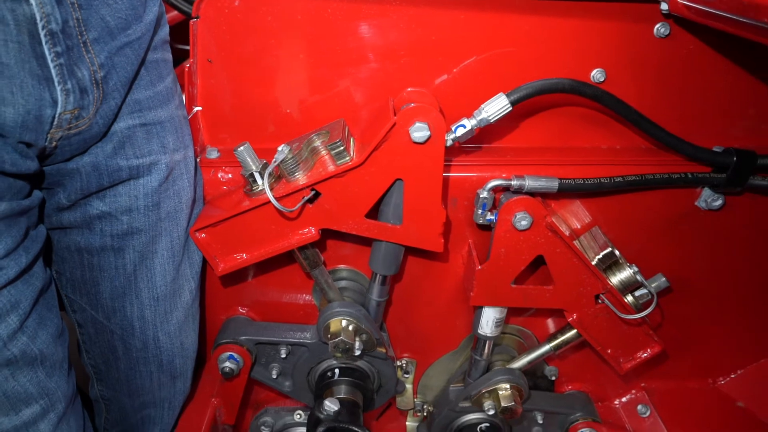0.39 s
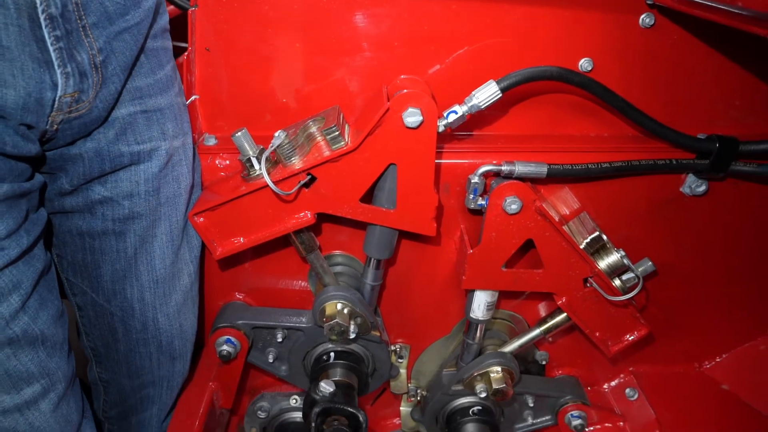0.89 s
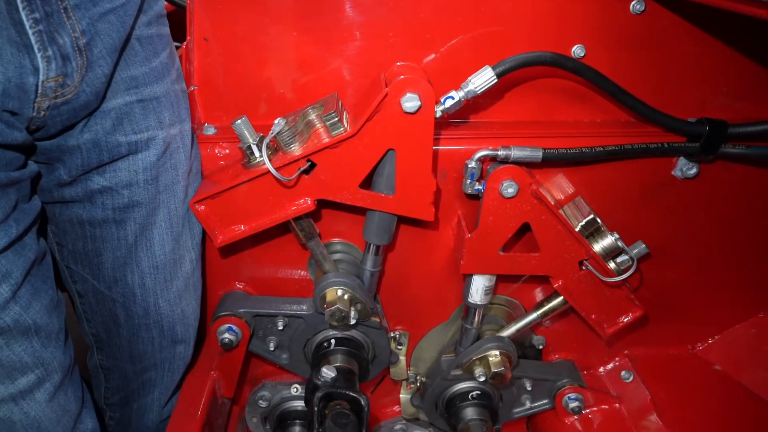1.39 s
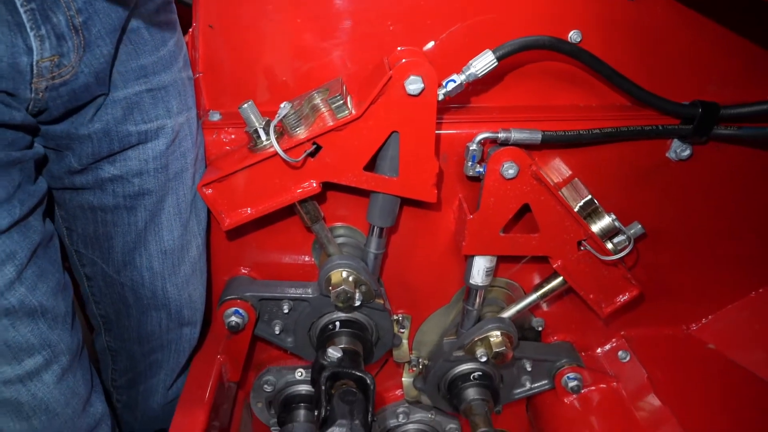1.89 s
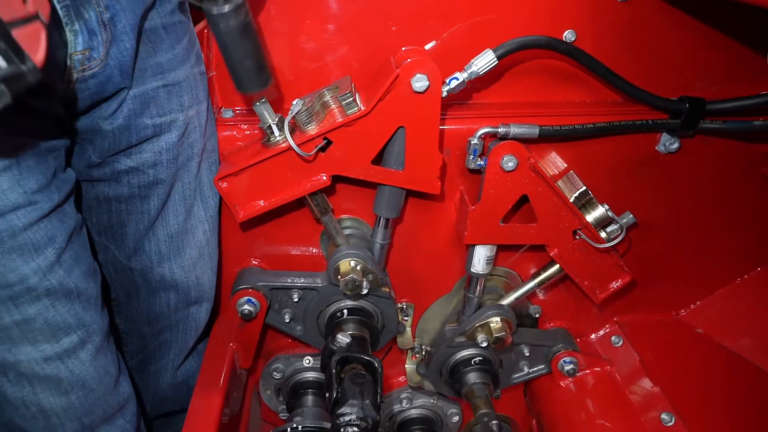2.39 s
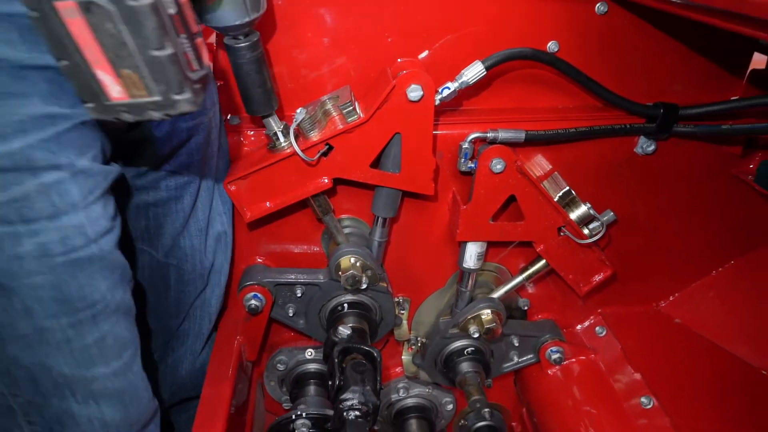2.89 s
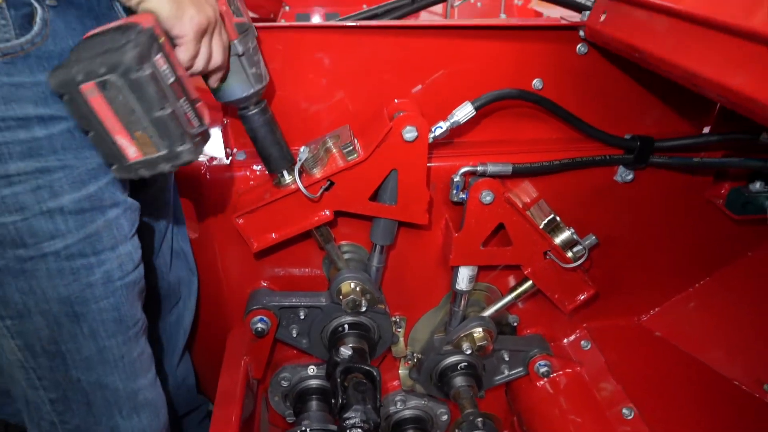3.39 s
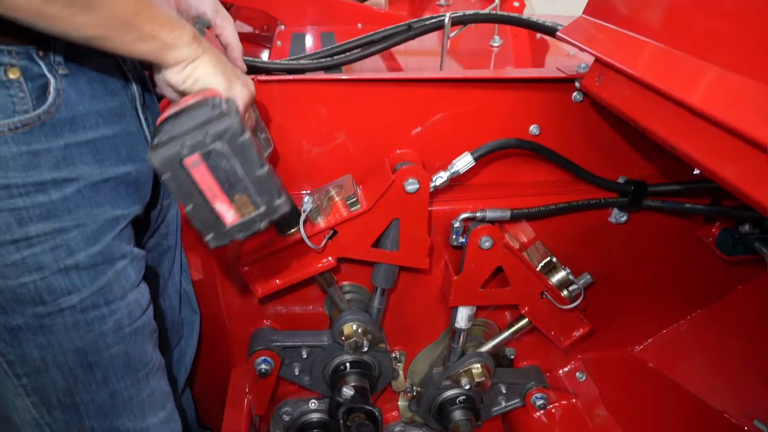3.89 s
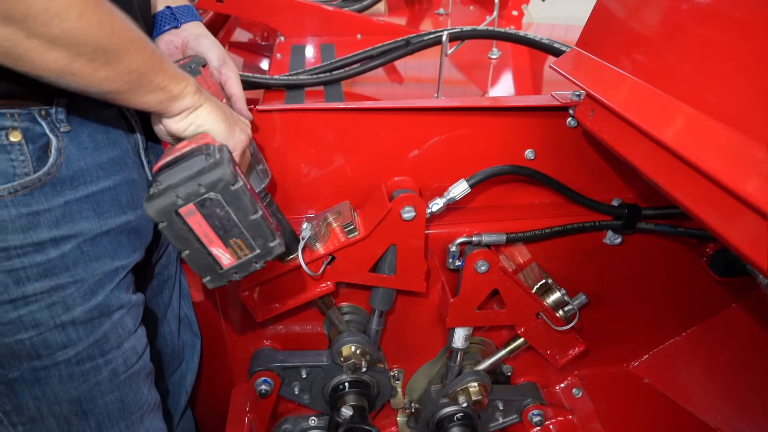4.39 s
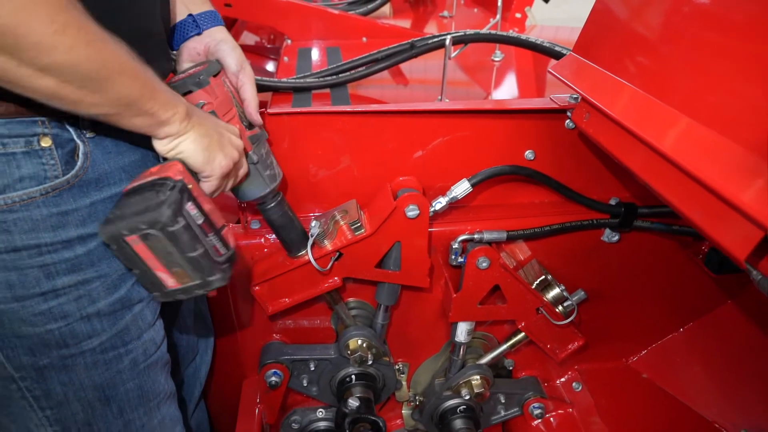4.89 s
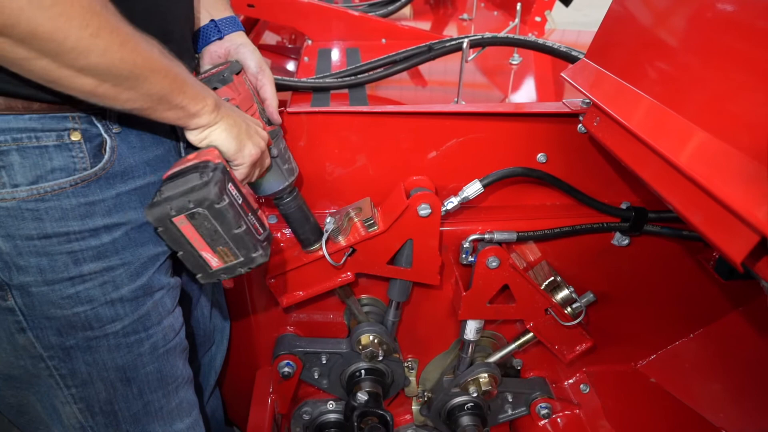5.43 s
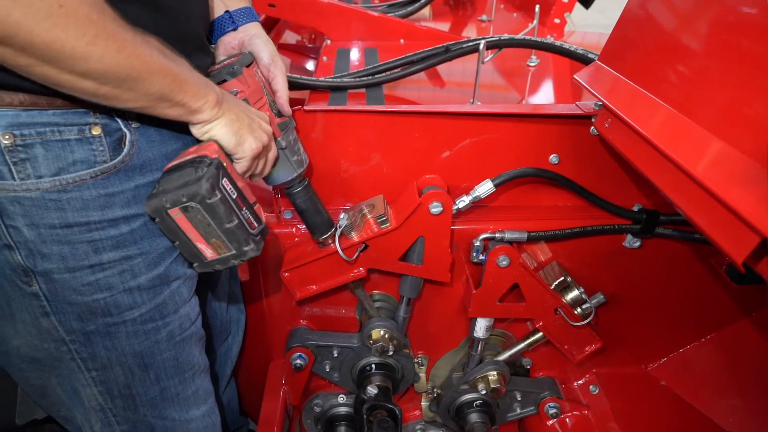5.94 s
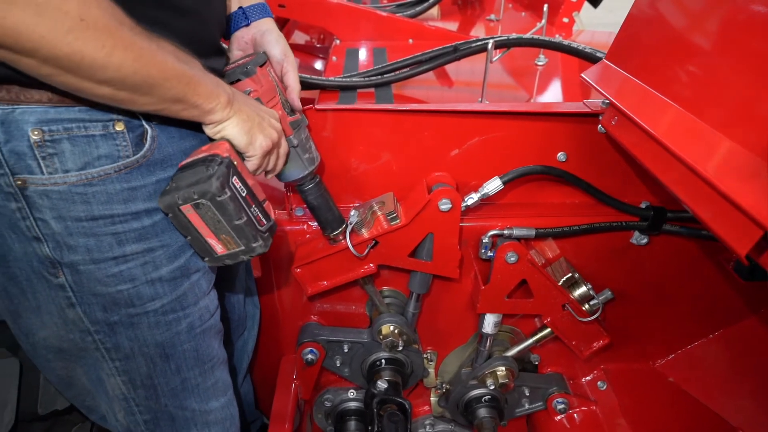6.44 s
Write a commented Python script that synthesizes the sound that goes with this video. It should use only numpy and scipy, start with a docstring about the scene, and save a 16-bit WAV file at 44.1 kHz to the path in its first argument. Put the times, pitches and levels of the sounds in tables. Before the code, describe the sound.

Close recording of a cordless impact driver at a metal machine inside a big hall. First comes a sharp panel knock and a rattling, ringing pin; then sparse clicks, faint taps and low room hum. A heavy double socket knock precedes about half a second of irregular harsh hammering, a groaning grind, a brief gear whine that rises and falls, braking clacks, and a long diffuse tail.

```python
"""The echo of an earlier blow dies away, sheet metal is knocked, then a steel pin clatters on it in a large hall.
A cordless impact driver is blipped, its socket knocks onto a bolt, it hammers, grinds the bolt round, runs free
with a gear whine and stops. Blows are noise bursts with ringing modes; the drive is grains, gliding gear tones,
a switching tone and a low shake. Taps, ticks, cloth, air, a hum and a low rumble fill in; the hall is a
decaying noise tail."""
import sys
import numpy as np
from scipy import signal
from scipy.fft import rfft, irfft
from scipy.io import wavfile
from scipy.ndimage import uniform_filter1d

SR = 44100
rng = np.random.default_rng(int(sys.argv[2]) if len(sys.argv) > 2 else 0)


def wrap_up_sound(samples):
    """Save the sound to the file named by the first command line argument, as 16-bit audio."""
    columns = np.atleast_2d(samples).T
    # keep every value between -1 and 1, then stretch to whole-number steps
    tamed = np.clip(columns, -1, 1)
    steps = np.round(tamed * 32767).astype(np.int16)
    wavfile.write(sys.argv[1], SR, steps)


def volts(x):
    """Linear amplitude factor 10**(x/20) for a level x in dB, scalar or array-like."""
    e = np.asarray(x, float) / 20
    return 10 ** e


N = 288855  # samples in the scene


def evened(x):
    """Scales to rms 1."""
    return x / np.sqrt(np.mean(x ** 2) + 1e-20)


def read(points, hz):
    """Reads a spectrum table on a log frequency axis."""
    f, value = np.transpose(points)
    return np.interp(np.log(hz + 1), np.log(f + 1), value)


def add(mix, s, sound):
    """Mixes a sound in at time s in seconds, cut at the end of the mix."""
    part = mix[round(s * SR):][:len(sound)]
    part += sound[:len(part)]


def coloured(x, points):
    """Filters x by a spectrum table; rms 1."""
    hz = np.fft.rfftfreq(len(x), 1 / SR)
    return evened(irfft(rfft(x) * volts(read(points, hz)), len(x)))


def split(x, hz):
    """Low and high part of x."""
    return [signal.sosfilt(signal.butter(3, hz, kind, fs=SR, output="sos"), x) for kind in ("low", "high")]


def wander(count, width):
    """Slow random drift, rms 1: noise averaged over a width in samples."""
    return evened(uniform_filter1d(rng.standard_normal(count), width))


def blows(table, colour, modes, ring_db, hollow_db, treble_share, crack_db, hall_db):
    """Each blow: a hollow body burst, a treble rattle with a crack, and modes at random strengths."""
    near, far = np.zeros(N), np.zeros(N)
    hz, mode_db, ring = np.transpose(modes)[:, :, None]
    ring = np.clip(ring, .01, .3)
    t, bins = np.arange(10240) / SR, np.fft.rfftfreq(10240, 1 / SR)
    fade = np.cos(np.pi / 2 * t / t[-1]) ** .5
    for s, level_db, treble_db, t60, hollow_hz in table:
        t60 = np.clip(t60, .008, .35)
        strength = volts(level_db)
        body = 1 / np.sqrt(1 + volts(2 * treble_db))  # body and treble share the blow's strength
        low, high = split(coloured(rng.standard_normal(len(t)), colour), 3800)

        # the body swells in and dies, boosted around its hollow resonance
        hollow = volts(hollow_db / (1 + (np.log2((bins + 1) / hollow_hz) / 0.19) ** 2))
        boxed = evened(irfft(rfft(low) * hollow))
        swell = body * (1 - np.exp(-t / 0.00038)) * volts(-60 * t / t60) * fade

        # the very top takes an extra decay, so it dies fastest
        mid, top = split(evened(high), 12000)
        top *= volts(-40 * t / t60) * (1 - np.exp(-t / .002))
        crack = volts(crack_db - 60 * t / 0.013)
        rattle = volts(-60 * t / (t60 * treble_share)) + crack
        treble = body * volts(treble_db) * (mid + top) * rattle * fade

        phase, luck_db = rng.random(hz.shape), 4 * rng.standard_normal(hz.shape)
        level = body * volts(ring_db + mode_db + luck_db + treble_db * (hz > 3800))
        rung = level * volts(-60 * t / ring) * np.sin(2 * np.pi * (hz * t + phase))
        add(near, s, strength * ((boxed * swell + treble) / 2 + rung.sum(0) * fade))
        # the hall hears the whole machine: no hollow boost, no modes
        add(far, s, strength * volts(hall_db) * (evened(low) * swell + treble) / 2)
    return near, far


# Hammer striking the anvil. Each row: start in seconds, relative level in dB, treble over body in dB.
HAMMER_BLOWS = [(4.822, -13.5, -5), (4.883, 0, -5), (4.894, 0, 0), (4.907, -3.5, -1), (4.913, -1, 1),
                (4.957, -2, 8.5), (4.997, -5.5, 0.5), (5.014, -2.5, -5), (5.044, -1, 6), (5.092, -4.5, 4),
                (5.136, -7, 4), (5.146, -8.5, 1.5), (5.204, -13.5, -4.5), (5.22, -15, 4),
                (5.289, -13.5, -1.5)]
# Tone of the hammer mechanism. Each row: frequency in Hz, relative density in dB per Hz.
HAMMER_SPECTRUM = [(180, -30), (300, -5.5), (1330, 10.5), (1930, 10.5), (2210, 9), (3650, 9), (4610, -3),
                   (6780, 12.5), (9020, -2), (10100, -9.5), (14900, -7.5), (15700, -11.5), (16500, -43.5)]
# Modes of the struck anvil. Each row: frequency in Hz, relative level in dB, time to fall 60 dB in seconds.
ANVIL_MODES = [(3650, -5, 0.046), (6640, -8, 0.035), (6240, 3, 0.058), (6740, -9.5, .04),
               (6630, -2.5, 0.14), (8050, -1, 0.057), (9100, -3.5, 0.096), (14400, -25.5, 0.036)]


def hammering():
    """Hammer blows ring the anvil over a short hollow body."""
    t60_s, hollow_hz = 0.082, 2600
    table = [(*row, t60_s, hollow_hz) for row in HAMMER_BLOWS]
    return blows(table, HAMMER_SPECTRUM, ANVIL_MODES, -17.5, 3.2, 0.88, 1.3, hall_db=-5)


# The driver under way. Each row: time in seconds, body level in dB, treble relative to that level in dB,
# low shudder relative to that level in dB.
GRIND_LEVELS = [(4.815, -29.5, 16, -19), (4.829, -32.5, 1.5, -24), (4.88, -23, -11, -13),
                (4.95, -24, -8, -10.5), (5.15, -24, -4, -10.5), (5.22, -19, -8.5, -4),
                (5.498, -23.5, -11, -7), (5.56, -18.5, -6, -16), (5.72, -17.5, -3.5, -11.5),
                (5.8, -18, -7, -15), (5.9, -19.5, -8.5, -8), (5.941, -52.5, -12.5, 20.5)]
# Tone of the grind before its registers are balanced. Each row: frequency in Hz, density in dB per Hz.
GRIND_SPECTRUM = [(47, -27.5), (80, -19), (153, -21.5), (407, -13.5), (761, -3.5), (951, -5), (1660, -2),
                  (2710, -1), (3240, -2.5), (3700, -1.5), (4950, -5.5), (5790, -1.5), (10100, -15),
                  (15100, -41), (16500, -52.5)]


def grind():
    """Gears, motor and the turning bolt: dense uneven grains in three registers."""
    s, level_db, treble_db, shudder_db = np.transpose(GRIND_LEVELS)
    t = np.arange(s[0], s[-1], 1 / SR)
    grains_per_s = 15000
    size = volts(1.5 * np.minimum(rng.exponential(1, len(t)), 4))
    size *= rng.random(len(t)) < grains_per_s / SR
    noise = coloured(size * rng.standard_normal(len(t)), GRIND_SPECTRUM)
    rest, treble = split(noise, 3010)
    shudder, body = split(rest, 430)
    parts = ((body, 0 * s), (treble, treble_db), (shudder, shudder_db))
    sound = sum(evened(p) * volts(np.interp(t, s, level_db + db)) for p, db in parts)
    out = np.zeros(N)
    add(out, s[0], sound * signal.windows.tukey(len(t), .02))
    return out


# Gear mesh and its side orders. Each row: multiple of the mesh pitch, relative level in dB,
# rms pitch jitter as a share.
GEAR_ORDERS = [(.26, -1, .06), (.3, -3, .06), (.34, -1, .045), (.7, -4, .008), (.77, -3, .008),
               (1, 0, .005), (1.24, -8, .004), (1.55, -8, .004), (2, -11, .005), (2.3, -14, .004),
               (2.8, -13, .004)]
# What the tool's case lets through. Each row: frequency in Hz, gain in dB.
CASE_RESPONSE = [(500, -6), (1200, 0), (3800, 0), (4300, -6), (4650, 0), (5200, -10), (5650, 0), (7500, 0),
                 (10000, 0), (10700, -8)]


def whine():
    """Free run: gear orders climb and fall along a bowed arch, fluttering in strength and pitch."""
    start_s, top_s, end_s = 5.535, 5.712, 5.862
    top_hz, end_hz, bow = 3840, 2150, 2.6
    level_db, slow_db = -24, 6  # at top speed; louder per octave below it
    side_loss_db = 28  # side orders lose this much per octave below top speed
    t = np.arange(start_s, end_s, 1 / SR) - top_s
    mesh_hz = top_hz - (top_hz - end_hz) * np.maximum(t / t[0], t / t[-1]) ** bow
    slow = np.log2(top_hz / mesh_hz)  # octaves below top speed
    sound = np.zeros(len(t))
    for multiple, order_db, jitter in GEAR_ORDERS:
        order_hz = multiple * mesh_hz * (1 + jitter * wander(len(t), 200))
        flutter_db = 2.64 * evened(uniform_filter1d(wander(len(t), 500), 500))
        order_db = order_db - (multiple != 1) * side_loss_db * slow
        level = volts(order_db + flutter_db + read(CASE_RESPONSE, order_hz))
        sound += level * np.sin(2 * np.pi * np.cumsum(order_hz) / SR)
    sound *= np.sqrt(2) * volts(level_db + slow_db * slow) * signal.windows.tukey(len(t), .18)
    out = np.zeros(N)
    add(out, start_s, sound)
    return out


# Bands that sing under load. Each row: start in seconds, end in seconds, pitch in Hz,
# rms waver as a share, peak level in dB.
GROANS = [(5.2, 5.5, 277, .03, -38), (5.19, 5.35, 318, .03, -40), (5.15, 6.4, 175, .03, -49),
          (4.88, 5.5, 2030, .015, -28), (4.82, 4.91, 2750, .04, -29), (5.18, 5.48, 4780, .016, -35)]


def groan():
    """Wavering tones of the loaded frame and gears."""
    out = np.zeros(N)
    for start, end, hz, waver, db in GROANS:
        t = np.arange(0, end - start, 1 / SR)
        drift = 1 + waver * wander(len(t), round(10 * SR / hz))  # over ten cycles
        tone = np.sin(2 * np.pi * np.cumsum(hz * drift) / SR)
        add(out, start, volts(db) * tone * signal.windows.tukey(len(t), .4))
    return out


# Motor controller on. Each row: start in seconds, end in seconds, tone in dB, octave in dB, each sideband in dB,
# sideband spacing at the start in Hz, spacing at the end in Hz.
CONTROLLER_BURSTS = [(1.797, 1.968, -53, -62, -62, 83, 83), (4.805, 4.82, -40, -66, -60, 10, 100),
                     (4.82, 4.89, -50, -70, -42, 230, 250), (5.47, 5.575, -70, -90, -41, 20, 850)]


def controller():
    """Switching tone, its octave, sidebands spaced by rotor speed, and winding buzz at each commutation."""
    switch_hz, buzz_db = 7880, 12
    out = np.zeros(N)
    for start, end, tone_db, octave_db, side_db, first_hz, last_hz in CONTROLLER_BURSTS:
        t = np.arange(0, end - start, 1 / SR)
        a = 2 * np.pi * switch_hz * t
        rotor = 2 * np.pi * np.cumsum(np.linspace(first_hz, last_hz, len(t))) / SR
        sound = (volts(tone_db) + 2 * volts(side_db) * np.cos(rotor)) * np.sin(a)
        sound += volts(octave_db) * np.sin(2 * a)
        # two noise puffs per rotor cycle
        puffs = np.diff(rng.standard_normal(len(t) + 1)) * np.exp(-(rotor / np.pi % 1) / 0.29)
        sound += volts(octave_db + buzz_db) * puffs
        add(out, start, np.sqrt(2) * sound * signal.windows.tukey(len(t), .1))
    return out


# Gears clacking under the brake. Each row: start in seconds, relative level in dB.
BRAKE_CLACKS = [(5.813, -2.5), (5.831, -7), (5.865, -3), (5.88, -8.5), (5.90, -6), (5.923, -12.5)]


def braking():
    """Gears clack with the anvil's modes as the brake stops the motor."""
    treble_db, t60_s, hollow_hz = -6.5, 0.07, 1700
    table = [(*row, treble_db, t60_s, hollow_hz) for row in BRAKE_CLACKS]
    return blows(table, HAMMER_SPECTRUM, ANVIL_MODES, -23, 3.4, 1.0, 2, hall_db=-42.5)


# Trigger pulled and let go. Each row: start in seconds, relative level in dB, treble over body in dB,
# nominal time to fall 60 dB in seconds, hollow resonance in Hz.
TRIGGER_MOVES = [(1.811, -20, -10, 0.27, 2480), (1.822, -25.5, 1, .087, 2460),
                 (1.836, -12.5, -3, 0.061, 2120), (1.970, -26.5, -1, 0.2, 1970),
                 (1.9773, -9, -2, 0.03, 1570), (2.005, -28.5, -12, 0.028, 1900),
                 (2.019, -23.5, -7.5, 0.045, 2030), (2.036, -28.5, -20, 0.043, 1250)]
# Tone of the clicks. Each row: frequency in Hz, relative density in dB per Hz.
CLICK_SPECTRUM = [(120, -39), (200, -3), (961, 4), (1220, 12.5), (2050, 12), (4290, 6.5), (5870, 10),
                  (9840, -9.5), (13000, -14.5), (15600, -14), (16500, -26.5)]
# Modes of the driver housing. Each row: frequency in Hz, relative level in dB,
# nominal time to fall 60 dB in seconds.
HOUSING_MODES = [(2120, 21.5, 0.0087), (3980, -5, 0.024), (6320, 12, 0.0079), (7250, -6, .02),
                 (11154, -29, 0.24)]


def trigger():
    """Trigger clicks excite the short modes of the housing."""
    return blows(TRIGGER_MOVES, CLICK_SPECTRUM, HOUSING_MODES, -23, 6.6, 1.0, 1.3, hall_db=-25.5)


# A first knock on sheet metal, then a steel pin clattering on it. Each row: start in seconds,
# relative level in dB, treble over body in dB, nominal time to fall 60 dB in seconds, hollow resonance in Hz.
SHEET_BLOWS = [(.181, -7, -1, 0.28, 1674), (.429, -19.5, 0.5, 0.31, 1135), (.462, -3.5, 2.5, 0.4, 894),
               (.488, -11, -10, 0.23, 875), (.529, -10.5, -0.5, 0.26, 821), (.555, -12.5, 1.5, .2, 1938),
               (0.573, -5, -0.5, .17, 920), (.609, -13.5, 3.5, 0.4, 1862)]
# Tone of these blows. Each row: frequency in Hz, relative density in dB per Hz.
SHEET_SPECTRUM = [(35, -24), (60, 4), (629, 3.5), (2970, 1), (6450, 3.5), (8750, -7.5), (9610, -9.5),
                  (11900, -12.5), (13400, -18.5), (15400, -24), (16500, -40)]
# Modes of the sheet-metal panel. Each row: frequency in Hz, relative level in dB,
# nominal time to fall 60 dB in seconds.
PANEL_MODES = [(730, -1, 0.13), (1390, -19.5, 0.068), (1860, -9.5, 0.095), (2040, -4.5, 0.37),
               (2476, -4.5, .07), (3270, -4, 0.14), (5400, -1.5, 0.072), (6500, -9, 0.14),
               (7070, -15.5, 0.073), (10980, -33, 0.15)]


def sheet_clatter():
    """The panel's bursts and modes under the first knock and each strike of the pin."""
    return blows(SHEET_BLOWS, SHEET_SPECTRUM, PANEL_MODES, -15.5, 4.9, 0.77, 3.3, hall_db=-12.5)


# Modes of the pin itself. Each row: frequency in Hz, relative level in dB, time to fall 60 dB in seconds
# while undamped, share damped when it comes to rest.
PIN_MODES = [(6255, -11, .4, 1), (6420, -8, .45, 1), (8906, -11, .3, 1), (8936, -14, .3, 1),
             (9622, -34, .8, 0), (10206, -11, .9, 1), (11724, -10, .35, 1), (12021, -4, .3, .5),
             (13670, -21, .45, .3), (14922, -13, .5, .3)]


def pin_ring():
    """Clear pin partials, faint at the first knock, add up blow by blow; most are damped when it rests."""
    loose_s, rest_s = .4, .65
    ring_db, held_db = -8, -30.5  # over the blow's treble; added before the pin is loose
    out = np.zeros(N)
    hz, mode_db, ring, damped = np.transpose(PIN_MODES)[:, :, None]
    t = np.arange(SR) / SR
    for s, level_db, treble_db, *_ in SHEET_BLOWS:
        db = level_db + treble_db + ring_db + held_db * (s < loose_s)
        phase, luck_db = rng.random(hz.shape), 1.7 * rng.standard_normal(hz.shape)
        held = np.maximum(t + s - rest_s, 0) * damped
        decay_db = -60 * (t / ring + held / 0.13)
        partials = volts(db + mode_db + luck_db + decay_db) * np.sin(2 * np.pi * (hz * t + phase))
        add(out, s, partials.sum(0))
    return out


# Socket and tools knocking on the machine. Each row: start in seconds, relative level in dB,
# treble over body in dB, nominal time to fall 60 dB in seconds, hollow resonance in Hz.
TOOL_KNOCKS = [(1.168, -27.5, -1.5, 0.048, 1860), (1.244, -32.5, -20.5, 0.04, 2703),
               (2.892, -42, -20, .033, 1960), (3.068, -19.5, -10.5, 0.048, 1980),
               (3.072, -15.5, -14.5, 0.24, 1870), (3.211, -20, -11.5, 0.28, 1970),
               (3.216, -19.5, -15, 0.28, 2000), (3.282, -24, -13.5, 0.23, 706),
               (3.301, -24.5, -9.5, .051, 1980), (3.81, -34, -12, 0.15, 1940),
               (3.827, -29.5, -21, 0.43, 1700), (3.838, -29, -9, .12, 2240), (3.880, 2, -2.5, 0.073, 1480),
               (3.90, -3, -9, .15, 1390), (6.433, -20, -2, .15, 2950), (6.445, -18.5, -6.5, 0.11, 760)]
# Tone of the knocks. Each row: frequency in Hz, relative density in dB per Hz.
KNOCK_SPECTRUM = [(24, -50), (40, -21), (201, -5), (823, 2.5), (1360, 3.5), (1510, 4), (2560, 2.5),
                  (4800, -13), (7370, -10), (10200, -33.5), (15300, -42), (16500, -66)]


def knocks():
    """Socket and tools knock on the machine and set off its panel."""
    return blows(TOOL_KNOCKS, KNOCK_SPECTRUM, PANEL_MODES, -19, 10.6, 0.89, 0.86, hall_db=-14.5)


# Dull taps of a hand or tool. Each row: start in seconds, relative level in dB,
# time to fall 60 dB in seconds, hollow resonance in Hz.
DULL_TAPS = [(.680, -7, .035, 1000), (.712, -18, .035, 850), (2.83, -34, .05, 720), (2.996, -38, .15, 200),
             (3.030, -33, .04, 1920)]
# Tone of the taps. Each row: frequency in Hz, relative density in dB per Hz.
TAP_SPECTRUM = [(50, -20), (120, 0), (2000, -10), (3000, -22), (6000, -30), (16500, -60)]


def taps():
    """Dull taps, nearly without treble, with one strong hollow note each."""
    table = [(s, db, -30, t60, hz) for s, db, t60, hz in DULL_TAPS]  # treble 30 dB under the body
    return blows(table, TAP_SPECTRUM, PANEL_MODES, -34, 17, 0.98, 1.5, hall_db=-15)


# Small loose parts. Each row: start in seconds, relative level in dB.
LOOSE_TICKS = [(1.33, -52), (1.575, -59), (1.64, -59.5), (1.71, -56), (3.362, -45), (3.405, -53),
               (3.443, -49.5), (3.626, -35), (3.78, -48), (4.324, -39.5), (6.268, -49), (6.342, -35.5)]


def ticks():
    """Thin bright ticks of small loose parts: short bursts with more treble than body."""
    treble_db, t60_s, hollow_hz = 2.5, .033, 700
    table = [(*row, treble_db, t60_s, hollow_hz) for row in LOOSE_TICKS]
    return blows(table, KNOCK_SPECTRUM, PANEL_MODES, -13, 9.6, 0.98, 1.3, hall_db=-10)


# Cloth swishing as the worker moves. Each row: middle in seconds, spread in seconds, level in dB.
CLOTH_STROKES = [(2.51, 0.036, -49.5), (2.73, 0.037, -57), (2.94, 0.06, -62.5)]
# Tone of the fabric. Each row: frequency in Hz, relative density in dB per Hz.
CLOTH_SPECTRUM = [(290, -58), (500, -31.5), (559, 5.5), (679, -21.5), (923, 4), (1020, -30), (1090, -6),
                  (1780, 7.5), (3190, -3.5), (6590, -4), (14000, -31)]


def cloth():
    """Fine friction grains under each stroke of the fabric."""
    t = np.arange(N) / SR
    strokes = sum(volts(db) * np.exp(-((t - s) / spread) ** 2 / 2) for s, spread, db in CLOTH_STROKES)
    grains = volts(2.3 * rng.exponential(1, N)) * rng.standard_normal(N)
    return strokes * coloured(grains, CLOTH_SPECTRUM)


# Echo length. Each row: frequency in Hz, time to fall 60 dB in seconds.
HALL_DECAY = [(100, 0.8), (260, 2.4), (700, 2.51), (1840, 2.49), (4850, 1.77), (8000, 1.05), (12800, 0.37)]
# Echo tone before it decays. Each row: frequency in Hz, relative level in dB.
HALL_SPECTRUM = [(60, 12), (300, 4.5), (1500, 3), (4000, -0.5), (8000, -0.5), (15000, 5)]


def hall(x):
    """A long diffuse noise tail, each band dying at its own speed; an earlier echo dies at the start."""
    hz, t, z = signal.stft(rng.standard_normal(3 * SR), SR, nperseg=512)
    tail_db = read(HALL_SPECTRUM, hz)[:, None] - 60 * t / read(HALL_DECAY, hz)[:, None]
    tail = signal.istft(z * volts(tail_db), SR, nperseg=512)[1]
    tail *= 1 - np.exp(-np.arange(len(tail)) / (0.006 * SR))  # the echo builds up
    tail /= np.linalg.norm(tail)
    out = signal.fftconvolve(x, tail)[:N]
    add(out, 0, volts(8) * tail[round(.5 * SR):])  # a blow half a second before the start
    return out


# Tone of the air noise. Each row: frequency in Hz, relative density in dB per Hz.
AIR_SPECTRUM = [(59, -18.5), (100, 10), (324, 1.5), (434, -1.5), (570, -4.5), (660, 0.5), (780, -6.5),
                (2990, -14), (3840, -19), (6220, -23), (15000, -44.5)]
# Low sounds: hum joined by driver shake around 5.3 s, and rumble. Each row: time in seconds,
# level near 76 Hz in dB, level near 44 Hz in dB.
LOW_LEVELS = [(0.0, -52, -54), (0.62, -53, -47.5), (0.75, -52, -56), (1.57, -50.5, -53), (1.9, -62, -55),
              (2.57, -51, -58.5), (3.03, -56.5, -46.5), (3.06, -53.5, -40), (3.3, -52.5, -55),
              (4.45, -46, -51), (4.76, -50.5, -61), (4.93, -66, -52), (5.27, -35, -34),
              (5.44, -42.5, -34.5), (6.42, -52, -38), (6.55, -49, -53)]


def background():
    """Air noise, a wavering low tone for hum and driver shake, and a narrow low rumble."""
    air_db, tone_hz, rumble_hz = -56.5, 76, 44.4
    s, tone_db, rumble_db = np.transpose(LOW_LEVELS)
    t, hz = np.arange(N) / SR, np.fft.rfftfreq(N, 1 / SR)
    air = volts(air_db) * coloured(rng.standard_normal(N), AIR_SPECTRUM)
    fuzz = evened(irfft(rfft(rng.standard_normal(N)) / (1 + ((hz - tone_hz) / 10) ** 2), N))
    tone = evened(np.sin(2 * np.pi * tone_hz * t) + 0.23 * fuzz)
    rumble = evened(irfft(rfft(rng.standard_normal(N)) / (1 + ((hz - rumble_hz) / 8) ** 2), N))
    return air + tone * volts(np.interp(t, s, tone_db)) + rumble * volts(np.interp(t, s, rumble_db))


def scene():
    """Everything near, its echo from the hall, and the background."""
    near, far = np.sum([hammering(), braking(), trigger(), sheet_clatter(), knocks(), taps(), ticks()], 0)
    running = grind() + groan()
    ring = pin_ring() + whine()
    echo = hall(far + volts(-13.5) * running + volts(-28) * ring)  # clear tones come back weaker
    return (near + ring + running + controller() + cloth() + echo + background())[None]


def top_cut(x):
    """Nothing passes above the cut-off."""
    return signal.sosfilt(signal.butter(12, 16800, fs=SR, output="sos"), x)


def record(dry):
    """Gain control ducks at loud blows and creeps back; peaks round off; the microphone loses the top."""
    power_db = 10 * np.log10(abs(uniform_filter1d(dry[0] ** 2, 200)) + 1e-12)
    fall = np.arange(N) * 17.4 / SR  # the held level falls 17.4 dB a second
    held_db = np.maximum.accumulate(power_db + fall) - fall
    over_db = np.maximum(held_db + 24.0, 0)  # above a -24 dB threshold
    ducked = dry / volts(0.25 * uniform_filter1d(over_db, 100))
    rounded = .8 * np.tanh(ducked / .8)  # soft overload
    finished = split(rounded, 15800)[0]
    return top_cut(finished)


dry = scene()
out = record(dry)
wrap_up_sound(out)
```